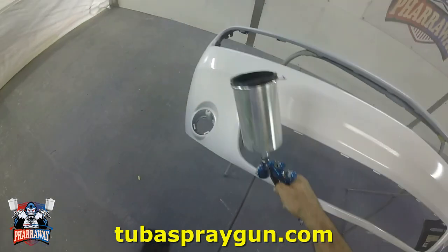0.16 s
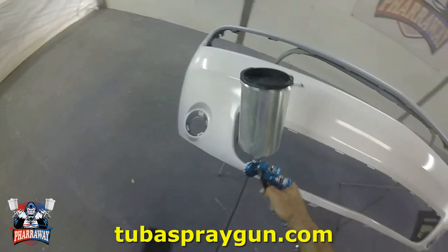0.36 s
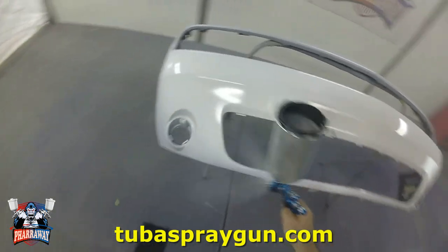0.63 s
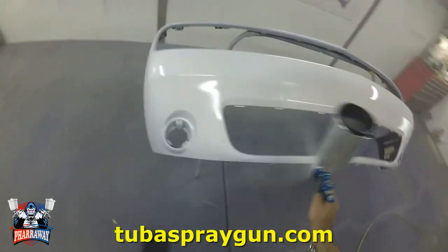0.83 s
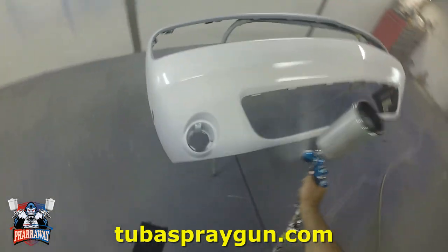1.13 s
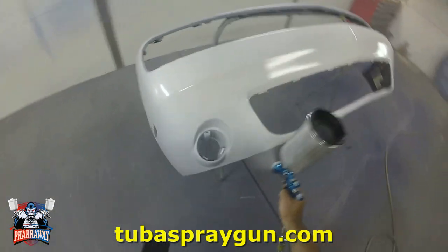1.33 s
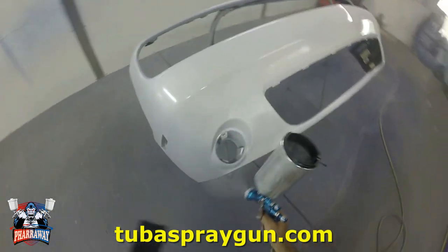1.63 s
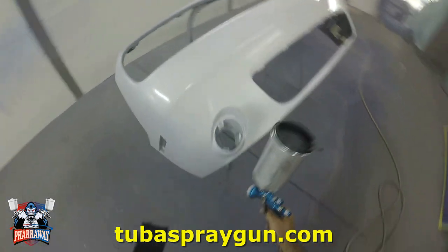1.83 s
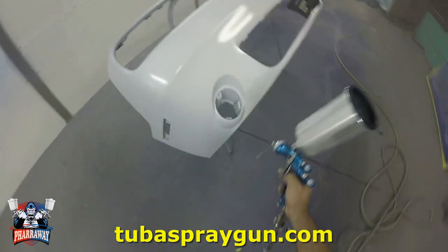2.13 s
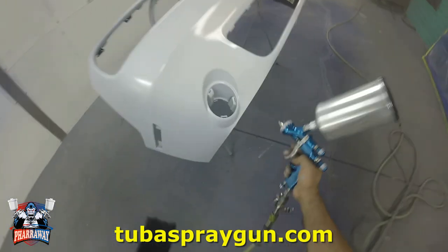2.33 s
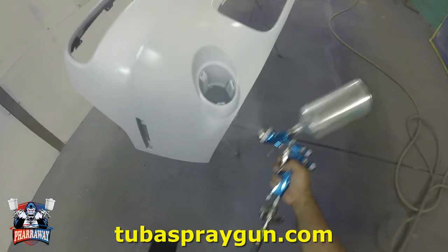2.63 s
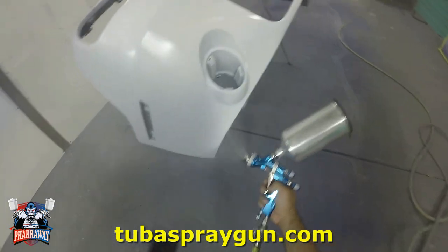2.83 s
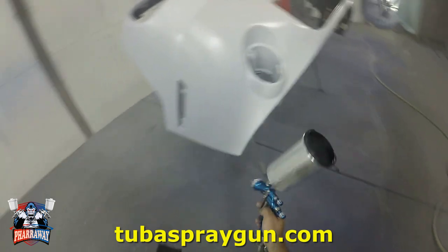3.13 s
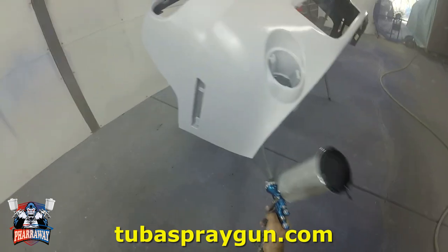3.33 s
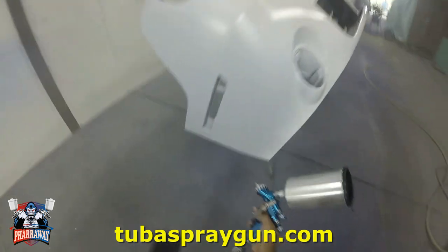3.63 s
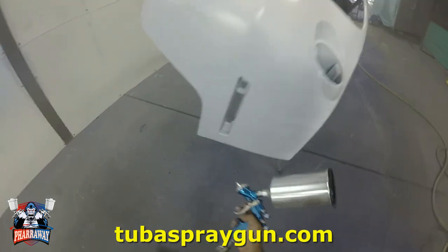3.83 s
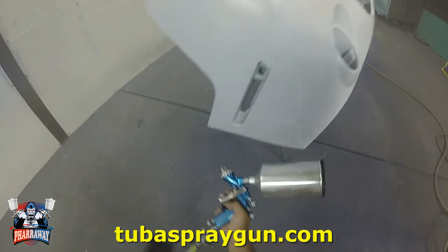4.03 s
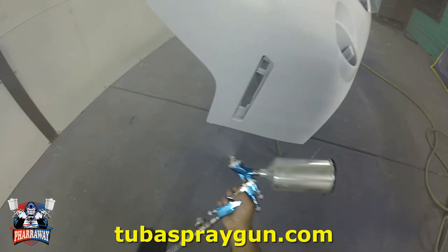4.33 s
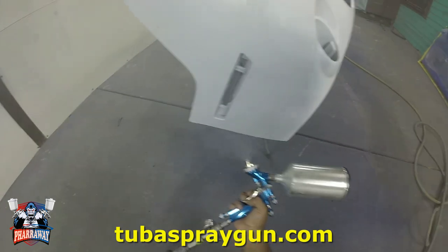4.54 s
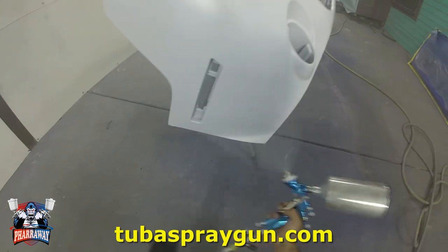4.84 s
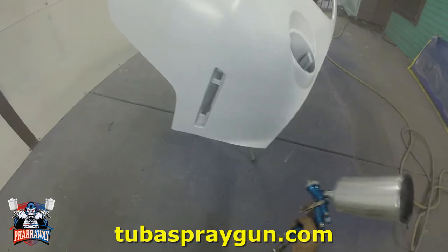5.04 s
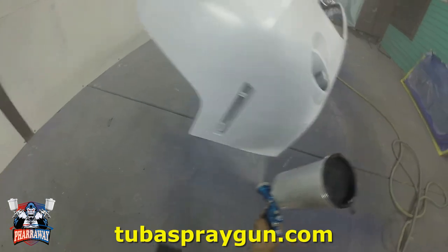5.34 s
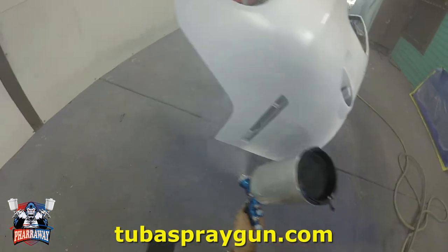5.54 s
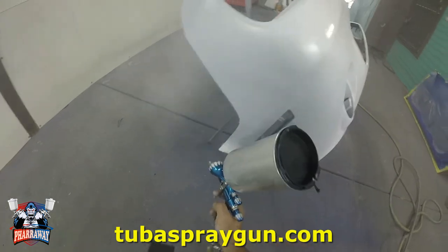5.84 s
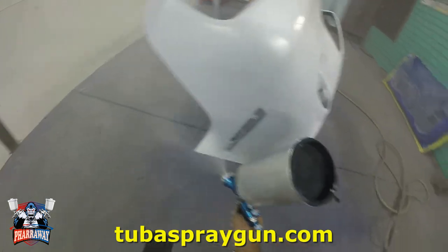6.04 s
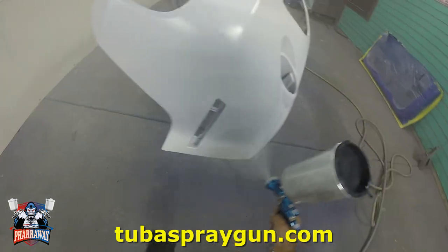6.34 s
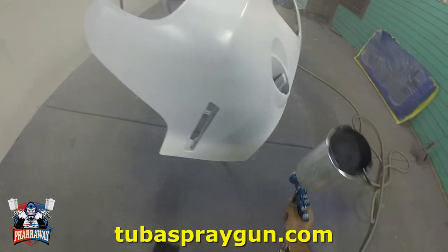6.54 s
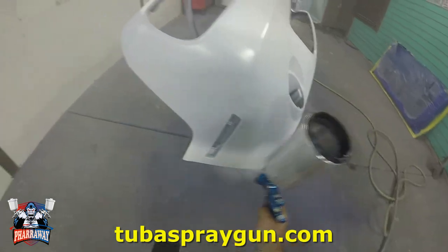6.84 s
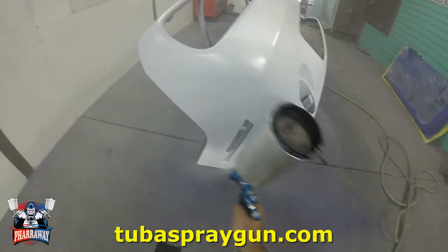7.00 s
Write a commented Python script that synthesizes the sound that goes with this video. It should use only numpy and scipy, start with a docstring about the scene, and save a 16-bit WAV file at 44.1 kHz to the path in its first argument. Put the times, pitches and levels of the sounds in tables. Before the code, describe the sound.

A paint spray gun at arm's length gives eight bright bursts of hissing air, each starting with a sharper spurt and closing softly into a short booth echo. A lower rush comes off the plastic panel, flaring at its edges. Steady extractor air and faint low drones fill the gaps. The head-worn microphone catches dull thumps, the strongest with a plastic tick midway, and sounds slightly boxy.

```python
"""In a spray booth, a compressed-air gun paints a plastic bumper at arm's length from a head-worn camera.
Behind it the extractor is steady noise with two narrow drones. Each of eight trigger pulls shapes noise into
a spurt that settles to a hiss, with a lower rush off the panel; fading noise tails are the booth's echoes.
Decaying sines make the paint cup's ring, low thumps (mostly gusts on the microphone) and the mount's ticks.
The camera's case colours everything through resonances and notches."""
import sys
import numpy as np
from scipy import signal
from scipy.fft import rfft, irfft
from scipy.io import wavfile

SR = 44100
rng = np.random.default_rng(int(sys.argv[2]) if len(sys.argv) > 2 else 0)


def store_pcm(level_fs):
    """Save levels as 16-bit WAV."""
    pcm = np.round(np.clip(level_fs, -1, 1) * 32767).astype(np.int16)
    wavfile.write(sys.argv[1], SR, np.atleast_2d(pcm).T)


N = 316197
TOP_HZ = 15280  # upper limit of the sound
TIME = np.arange(N) / SR
FREQ = np.fft.rfftfreq(N, 1 / SR)


def undb(db):
    """Turn decibels into a gain."""
    return 10 ** (np.asarray(db) / 20)


def unit(x):
    """Scale to an average (rms) level of 1."""
    return x / np.sqrt(np.mean(x ** 2))


def on_log_axis(points, hz):
    """Read a value between (Hz, value) points, with pitch on a log scale as the ear hears it."""
    point_hz, value = np.transpose(points)
    return np.interp(np.log(np.maximum(hz, 1)), np.log(point_hz), value)


def shape(x, gain):
    """Filter a sound with one gain for each frequency."""
    return irfft(rfft(x) * gain, N)


def white_noise():
    """Plain noise, equally strong at all frequencies."""
    return rng.standard_normal(N)


def noise(points):
    """Noise whose strength at each frequency follows points in dB per Hz."""
    return shape(white_noise(), undb(on_log_axis(points, FREQ)) * np.sqrt(SR / 2))


def walk(rate):
    """Smooth random drift of spread 1, up to about rate changes a second."""
    return unit(shape(white_noise(), np.exp(-(FREQ / rate) ** 2) * (FREQ > 0)))


def resonance(hz, width_hz):
    """Gain of a single peak, 1 at its middle and one half at the edges of its width."""
    return 1 / (1 + (2 * (FREQ - hz) / width_hz) ** 2)


def treble_above(hz):
    """Gain that lets through only the treble above hz."""
    return 1 - 1 / (1 + (FREQ / hz) ** 6)


def lift(x, band, db):
    """Raise or lower one band of x by a level that moves in time."""
    return x + (undb(db) - 1) * shape(x, band)


def fade(age_s, t60_s):
    """Decay that loses 60 dB in t60_s."""
    return np.exp(-np.log(1000) * age_s / t60_s)


# Extractor air, before its overall trim: pitch_hz [Hz], level_db [dB per Hz]
EXTRACTOR_AIR = [(20, -54.5), (35, -66), (60, -69), (120, -78), (250, -77.5), (500, -79.5), (1000, -81.5),
                 (1600, -85.5), (2700, -93.5), (4000, -94.5), (6000, -100.4), (9000, -110.9),
                 (15000, -122.3)]
# Fan drone, sliding in level during the walk round the bumper:
# pitch_hz [Hz], width_hz [Hz], start_db [dB], end_db [dB]
FAN_DRONE = [(160.2, 3.8, -57, -62.5), (307.7, 18, -70.5, -57)]


def extractor(trim_db=-0.95, gust_db=1.0):
    """Rushing air wavers a little; the fan's drone stands in the room, so it changes from place to place."""
    sound = noise(EXTRACTOR_AIR) * undb(trim_db + gust_db * walk(16))
    for pitch_hz, width_hz, start_db, end_db in FAN_DRONE:
        drone = unit(shape(white_noise(), resonance(pitch_hz, width_hz)))
        sound = sound + drone * undb(np.linspace(start_db, end_db, N))
    return sound


# Low thumps, mostly gusts of air buffeting the microphone; levels are before the rise and decay:
# start_s [s], thump_db [dB], thump_hz at first [Hz], rise_s [s], decay_s [s], scuff_db [dB]
LOW_THUMPS = [(0.839, -15.5, 25.6, 0.032, 0.07, -36.5), (1.405, -21.5, 24.2, 0.016, 0.088, -49),
              (2.03, -20.5, 24.8, 0.014, 0.059, -46), (2.42, -23, 28, 0.015, 0.03, -52),
              (2.715, -23, 25.4, 0.02, 0.042, -54), (3.627, -7.5, 37.4, 0.0081, 0.045, -41),
              (7.06, -29, 35.8, 0.035, 0.097, -39)]


def low_thumps(slowing=0.403, slowing_s=0.019, scuff_hz=190):
    """Mostly gusts buffeting the microphone: a few deep cycles that slow as they die, with a dull scuff."""
    out = np.zeros(N)
    scuff = unit(shape(white_noise(), 1 / (1 + (FREQ / scuff_hz) ** 3)))
    for start_s, thump_db, thump_hz, rise_s, decay_s, scuff_db in LOW_THUMPS:
        age = np.maximum(TIME - start_s, 0)
        # the pitch falls from thump_hz by the fraction slowing
        slowed_time = (1 - slowing) * age + slowing * slowing_s * (1 - np.exp(-age / slowing_s))
        thump = undb(thump_db) * np.sin(2 * np.pi * thump_hz * slowed_time)
        swell = (1 - np.exp(-age / rise_s)) * np.exp(-age / decay_s)
        out += swell * (thump + undb(scuff_db) * scuff)
    return out


# Ticks of the mount, before the pad dulls them: middle_s [s], push_db [dB], contact_s [s]
MOUNT_TICKS = [(3.6751, -14, 0.000058), (3.7911, -27.5, 0.0001), (3.804, -27, 0.00011)]
# Ringing tones of the mount, relative to each other: pitch_hz [Hz], level_db [dB], t60_s [s]
MOUNT_TONES = [(490, -17, 0.07), (616, -29, 0.023), (830, -10, 0.047), (960, -2.5, 0.0086),
               (1270, -28, 0.021), (1470, -5, 0.0072), (1970, -13.5, 0.029)]


def ticks(ring_db=-18, damped_hz=2550):
    """Short plastic contacts make the mount ring briefly; its rubber pad takes off the treble."""
    push = np.zeros(N)
    for middle_s, push_db, contact_s in MOUNT_TICKS:
        push += undb(push_db) * np.exp(-((TIME - middle_s) / contact_s) ** 2 / 2)
    t = TIME[:SR // 10]
    ring = np.zeros(len(t))
    for pitch_hz, level_db, t60_s in MOUNT_TONES:
        ring += undb(level_db) * np.sin(2 * np.pi * pitch_hz * t) * fade(t, t60_s)
    knock = push + undb(ring_db) * signal.fftconvolve(push, ring)[:N]
    return shape(knock, 1 / (1 + (FREQ / damped_hz) ** 8))


def cup_ring(start_s=3.25, pitch_hz=785, level_db=-48.5, t60_s=0.86):
    """One trigger release sets the aluminium paint cup ringing faintly, as a dying sine."""
    age = np.maximum(TIME - start_s, 0)
    return undb(level_db) * np.sin(2 * np.pi * pitch_hz * age) * fade(age, t60_s)


# How long the booth rings: pitch_hz [Hz], t60_s for a 60 dB fall [s]
BOOTH_DECAY = [(500, 0.71), (2000, 0.72), (4500, 0.56), (8000, 0.56), (14000, 0.34)]


def booth_tail(first_s=0.009):
    """Diffuse reflections from the hard booth walls, the treble dying first."""
    t = TIME[:SR]
    centres_hz = np.geomspace(250, 16000, 7)
    white = rfft(rng.standard_normal(SR))
    log_hz = np.log(np.maximum(np.arange(len(white)), 1))
    tail = np.zeros(SR)
    # each row of np.eye picks one band, blending into its neighbours
    for hz, share in zip(centres_hz, np.eye(len(centres_hz))):
        band = irfft(white * np.interp(log_hz, np.log(centres_hz), share), SR)
        tail = tail + band * fade(t, on_log_axis(BOOTH_DECAY, hz))
    tail = tail * (t > first_s)  # silent until the first reflection
    return tail / np.sqrt(np.sum(tail ** 2))


def booth_ring(x, wet_db=-6.0, count=10):
    """The gun keeps moving, so its sound fades from one pattern of reflections into the next."""
    shares = np.array([walk(8.5) for _ in range(count)])
    shares = shares / np.linalg.norm(shares, axis=0)
    echoes = np.zeros(N)
    for share in shares:
        echoes += signal.fftconvolve(x * share, booth_tail())[:N]
    return undb(wet_db) * echoes


def swish(x, depth_db, rate, count=26):
    """Narrow bands swell and fade on their own as the paths off the curved panel change."""
    edges_hz = np.linspace(0, 1, count) ** 2 * TOP_HZ
    spectrum = rfft(x)
    knots_s = np.arange(0, TIME[-1] + 1, 1 / rate)
    drift_db = depth_db * rng.standard_normal((count, len(knots_s)))
    out = np.zeros(N)
    for share, band_db in zip(np.eye(count), drift_db):
        band = irfft(spectrum * np.interp(FREQ, edges_hz, share), N)
        out += band * undb(np.interp(TIME, knots_s, band_db))
    return out


# Colour of the rush, relative levels: pitch_hz [Hz], level_db [dB per Hz]
RUSH_COLOUR = [(80, -18), (200, -4), (310, 0), (450, 0), (650, 0.5), (1100, -1.5), (1500, -4.5),
               (2300, -4.5), (4000, -10)]
# The air fan crosses an edge of the bumper: peak_s [s], flare_db added to the flat-panel rush [dB]
BUMPER_EDGES = [(2.88, -41.5), (3.19, -47), (4.68, -33.5), (5.48, -47), (5.86, -50), (6.23, -47),
                (7.12, -38.5)]


def panel_rush(flat_db=-57, rise_s=0.023, fall_s=0.065, buffet_db=2.0):
    """The air fan breaks on the panel with a low, unsteady rush that flares at each edge."""
    level = np.full(N, undb(flat_db))  # the smooth face of the bumper
    for peak_s, flare_db in BUMPER_EDGES:
        # the rush catches quickly and trails off
        distance = np.maximum((peak_s - TIME) / rise_s, (TIME - peak_s) / fall_s)
        level += undb(flare_db) * np.exp(-distance)
    return unit(noise(RUSH_COLOUR)) * level * undb(buffet_db * walk(25))


def pull(open_at_s, shut_at_s, open_s=0.0062, shut_s=0.036, settle_s=0.046, leak_s=0.011, leak_db=-21):
    """Valve opening in one pull, and the hose's surplus pressure, which bleeds off once it is open."""
    age = np.maximum(TIME - open_at_s, 0)
    opening = 1 - np.exp(-(age / open_s) ** 2)
    closing = np.exp(-np.maximum(TIME - shut_at_s, 0) / shut_s)
    # a little air slips past as the valve leaves its seat
    leak = undb(leak_db) * np.exp(-((TIME - open_at_s) / leak_s) ** 2)
    surplus = np.exp(-age / settle_s) * (age > 0)
    return opening * closing + leak, surplus


# Trigger pulls, one for each pass: open_at_s [s], shut_at_s [s], spurt_db of stored hose pressure [dB],
# spurt_treble_db [dB], hiss_db once settled, before the lifts [dB], treble_db lift [dB], air_cap_ring_db lift [dB]
TRIGGER_PULLS = [(-0.05, 0.244, 13, 3, -34, 2, 1.5), (0.623, 1.007, 7, 5.5, -34.5, 1.7, 4),
                 (1.138, 1.801, 4.5, 9.5, -35.5, 4, 2.5), (2.562, 3.223, 12, 8, -33.6, 1.5, 5),
                 (4.258, 5.055, 7.5, 5.5, -32.5, 2, 4.5), (5.199, 5.919, 5, 4, -33, 2.1, 4),
                 (6.001, 6.595, 5, 2, -33, 2.4, 5), (6.713, 7.4, 0.5, 10, -31.5, 0, 3)]


def trigger():
    """Air flow through the valve and its extra brightness: every pull starts with a spurt."""
    flow, bright_db = np.zeros(N), np.zeros(N)
    for open_at_s, shut_at_s, spurt_db, spurt_treble_db, *_ in TRIGGER_PULLS:
        valve, surplus = pull(open_at_s, shut_at_s)
        flow += valve * undb(spurt_db * surplus)
        bright_db += spurt_treble_db * surplus
    return flow, bright_db


# The gun turns in the hand and the hiss swells and changes colour; each change is added to the held value:
# middle_s [s], half_length_s [s], level_db [dB], treble_db [dB], air_cap_ring_db [dB]
WRIST_TURNS = [(1.502, 0.32, 3.5, -4, -1.5), (2.81, 0.18, 3.5, 0, -8), (4.81, 0.09, 2, 2.5, 1.2),
               (5.644, 0.23, 2, -3, 2), (6.257, 0.19, 2, -3.8, -0.5), (7.13, 0.11, -0.3, -2.5, 1)]


def aim():
    """Level, treble and cap ring in dB: held through each pass, apart from smooth turns of the wrist."""
    times = [s for open_at_s, shut_at_s, *_ in TRIGGER_PULLS for s in (open_at_s, shut_at_s)]
    columns = np.transpose(TRIGGER_PULLS)[-3:]  # hiss, treble and cap ring
    aim_db = np.array([np.interp(TIME, times, np.repeat(column, 2)) for column in columns])
    for middle_s, half_s, *change_db in WRIST_TURNS:
        turn = np.exp(-((TIME - middle_s) / half_s) ** 2)
        aim_db += np.outer(change_db, turn)
    return aim_db


# Colour of the nozzle hiss, relative levels: pitch_hz [Hz], level_db [dB per Hz]
NOZZLE_HISS = [(150, -17), (400, -26), (900, -19.5), (1500, -13), (2200, -11.5), (2700, -9.5), (4000, -1.5),
               (5000, -0.7), (6300, -1), (8500, -7), (12000, -13), (14000, -14.5), (15300, -21.5)]


def spray_gun(beam_hz=7800, spurt_hz=9500, cap_hz=4740, cap_width_hz=520, flutter_db=0.67):
    """A turbulent jet rings the air cap, beams its treble ahead and rushes lower where it meets the panel."""
    hiss_db, beam_db, cap_db = aim()
    flow, bright_db = trigger()
    jet = unit(noise(NOZZLE_HISS))
    jet = lift(jet, resonance(cap_hz, cap_width_hz), cap_db)
    jet = lift(jet, treble_above(beam_hz), beam_db)
    # the first air leaves faster, so it sounds sharper
    jet = lift(jet, treble_above(spurt_hz), bright_db)
    # paint tears off the nozzle unevenly, so the hiss flutters a little
    hiss = jet * undb(hiss_db + flutter_db * walk(59))
    return flow * (hiss + panel_rush())


def scene():
    """Booth, thumps, ticks, cup and gun add up, alike in both channels."""
    gun = spray_gun()
    background = extractor() + low_thumps() + ticks() + cup_ring()
    mono = background + booth_ring(gun) + swish(gun, depth_db=2.06, rate=14)
    return np.array([mono, mono])


# Resonances (plus) and notches (minus) of the camera case: pitch_hz [Hz], width_hz [Hz], change_db [dB]
CAMERA_CASE = [(1200, 105, 10), (1340, 274, -3.5), (1602, 370, 6), (2287, 40, -16.5), (2517, 390, 11),
               (2918, 192, 8), (3345, 120, 3.5), (3610, 75, -1.5), (3583, 88, 6.5), (3980, 92, -3),
               (4730, 540, 3.5), (5520, 174, 4), (6760, 250, -2.5), (7230, 330, 3.5), (9180, 900, 2.5),
               (10250, 390, -6), (10550, 740, 3)]


def record(dry, low_hz=17):
    """The camera's case rings and notches the sound; the deepest rumble and the top are filtered off."""
    for pitch_hz, width_hz, change_db in CAMERA_CASE:
        sharpness = pitch_hz / width_hz * undb(change_db / 2)
        b, a = signal.iirpeak(pitch_hz, sharpness, fs=SR)
        dry = dry + (undb(change_db) - 1) * signal.lfilter(b, a, dry)
    dry = signal.sosfilt(signal.butter(1, low_hz, "highpass", fs=SR, output="sos"), dry)
    return signal.sosfilt(signal.ellip(10, .2, 80, TOP_HZ, fs=SR, output="sos"), dry)


dry = scene()
out = record(dry)
store_pcm(out)
```